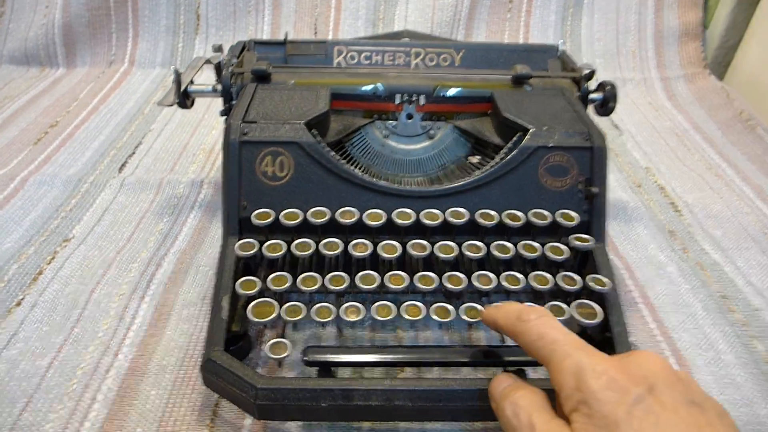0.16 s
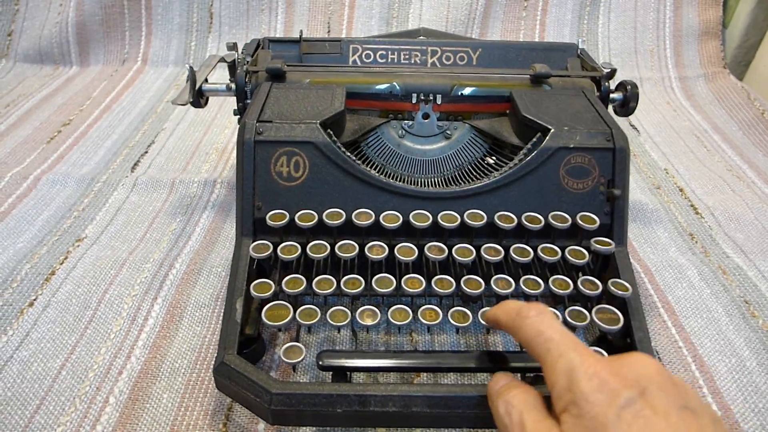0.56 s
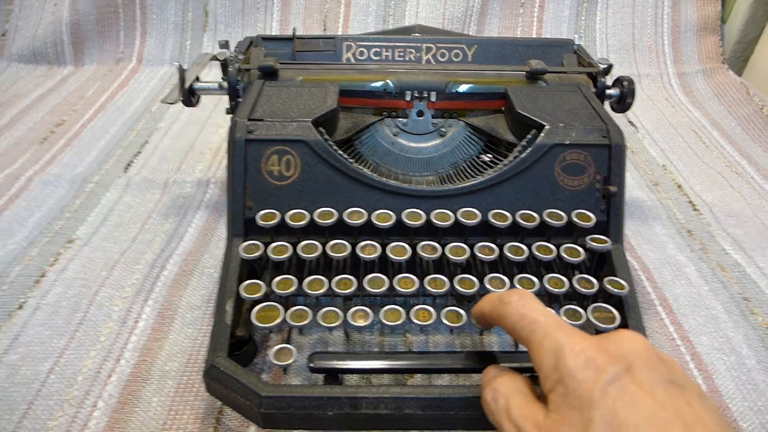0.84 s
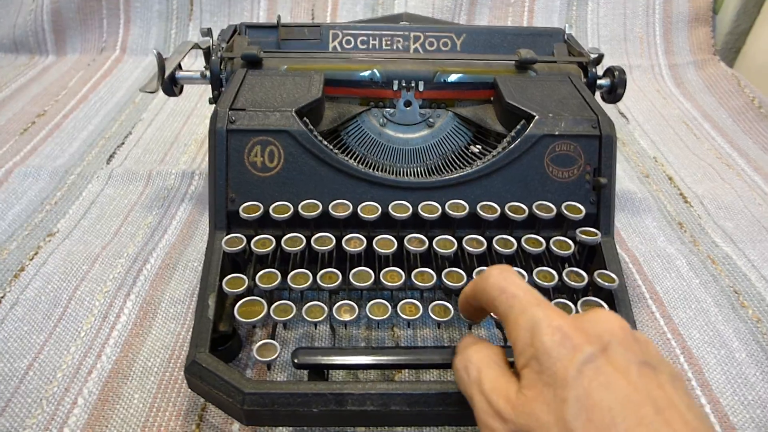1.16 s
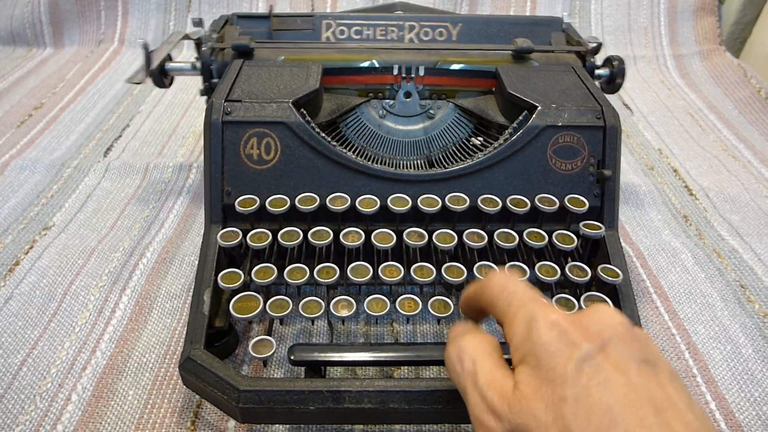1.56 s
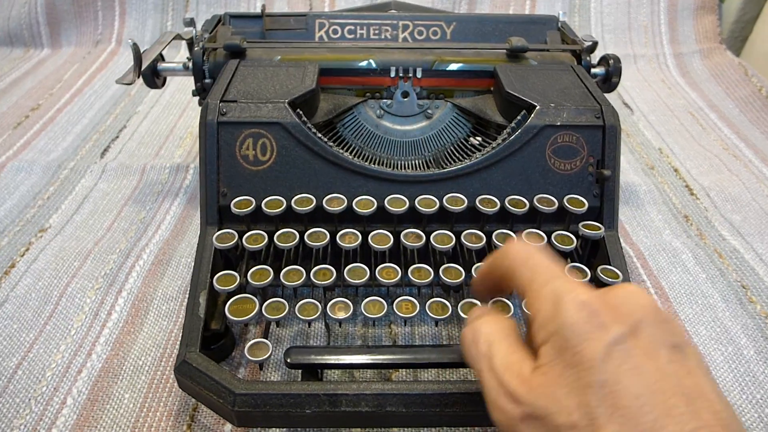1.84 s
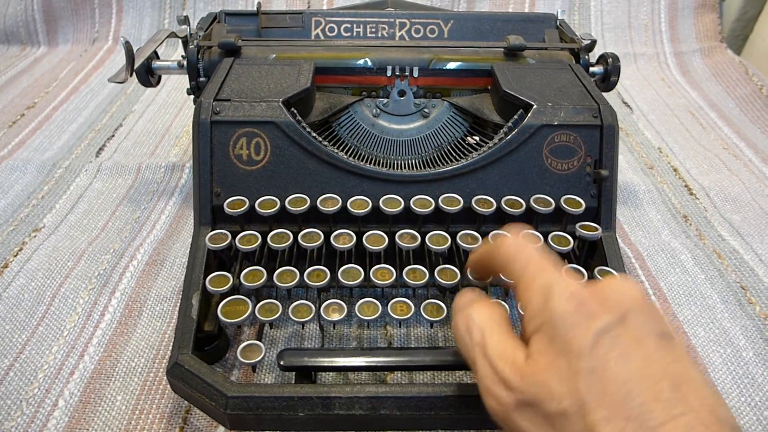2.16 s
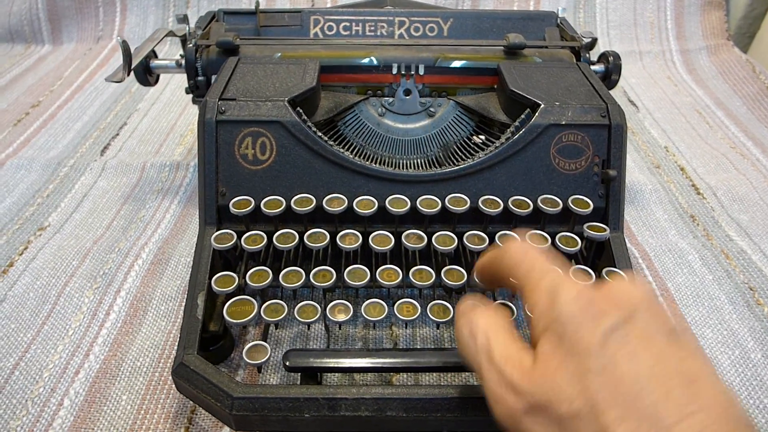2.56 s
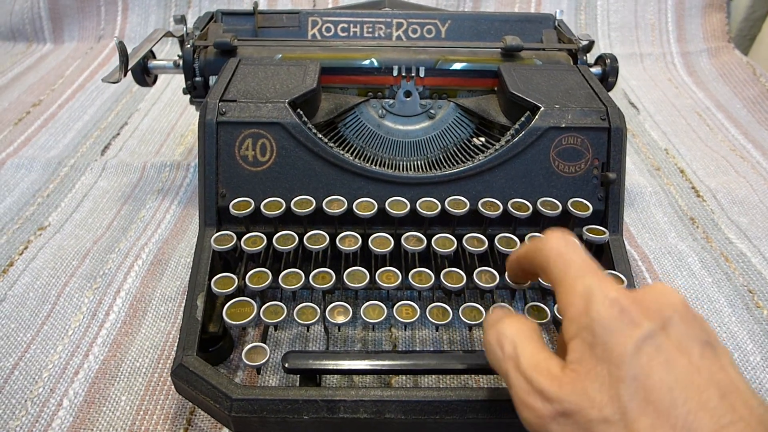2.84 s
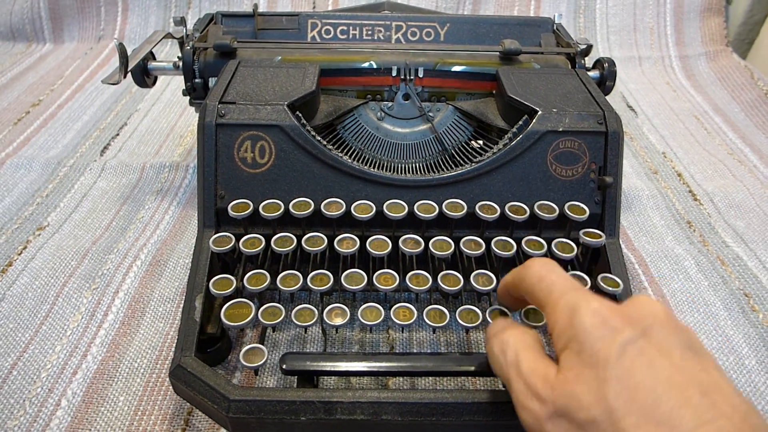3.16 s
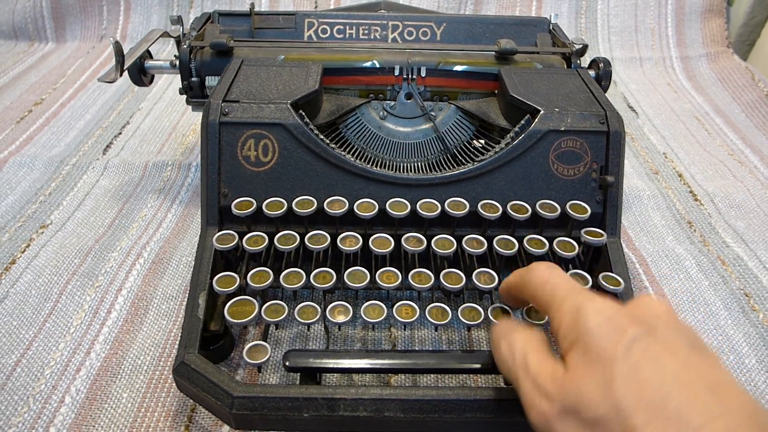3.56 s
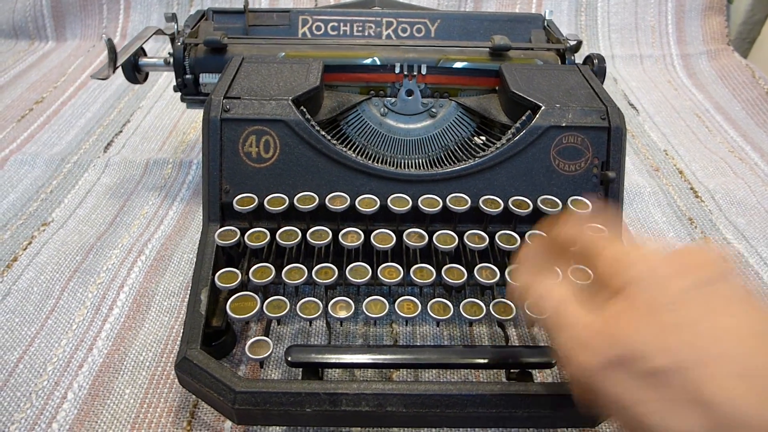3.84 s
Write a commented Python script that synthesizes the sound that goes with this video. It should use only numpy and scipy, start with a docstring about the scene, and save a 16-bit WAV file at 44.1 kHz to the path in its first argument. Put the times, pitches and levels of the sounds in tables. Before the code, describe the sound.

Typewriter keys struck by one finger, close to the microphone in a small quiet room: over a second of soft hiss, then three, three and four steady metallic clacks, with rattles and clinks between.

```python
"""Soft hiss and rumble of a small quiet room come first, with faint clinks of loose levers.
Then one finger types ten letters, in three bursts, on an old portable typewriter on a cloth, close in front.
Each stroke is a swelling clash of linkage and a thump of the case; on the hard ones the slug slaps the roller.
As the key comes up the escapement clicks and the type bar drops back and rattles; frame and springs ring on.
Clashes and rattles are shaped noise; cracks, thumps and rings are decaying sines; the room is a noise tail."""
import sys
import numpy as np
from scipy import signal
from scipy.fft import rfft, irfft
from scipy.io import wavfile
from scipy.ndimage import uniform_filter1d

SR = 44100
rng = np.random.default_rng(int(sys.argv[2]) if len(sys.argv) > 2 else 0)


def digitize_waveform(pressure):
    """Quantize a signal to 16-bit integers and store it at the path in sys.argv[1].

    Rows of a 2-D input are taken as channels; values are limited to [-1, 1].
    """
    field = np.atleast_2d(pressure).T
    bounded = np.clip(field, -1, 1)
    quanta = np.round(bounded * 32767).astype(np.int16)
    wavfile.write(sys.argv[1], SR, quanta)


N = 176400  # samples: 4 s


def undb(db):
    """Decibels to gain."""
    return 10 ** (np.asarray(db) / 20)


def unit(x):
    """Scale to rms 1."""
    return x / np.sqrt(np.mean(x ** 2))


def decay60(t, t60):
    """Exponential decay that falls 60 dB in t60 seconds."""
    return np.exp(-np.log(1000) * t / t60)


def high_pass(x, order, hz):
    """Remove the bass below a cutoff."""
    return signal.sosfilt(signal.butter(order, hz, "high", fs=SR, output="sos"), x)


def colour(x, points):
    """Filter by a spectrum of (Hz, dB) points, joined along log frequency."""
    hz, db = np.array(points, float).T
    f = np.fft.rfftfreq(len(x), 1 / SR)
    gain = undb(np.interp(np.log(f + 1), np.log(hz), db))
    return irfft(rfft(x) * gain, len(x))


def stereo(mid, side, side_db):
    """Left and right from a middle and a side signal."""
    return mid + undb(side_db) * side * np.array([[1], [-1]])


def ring(x, response):
    """Play a signal through an impulse response."""
    return signal.fftconvolve(np.atleast_2d(x), np.atleast_2d(response), axes=-1)[:, :N]


def bursts(rows):
    """Envelope of (start, dB, rise, decay) bursts, summed in power."""
    power, t = np.zeros(N + SR), np.arange(SR // 5) / SR
    for start, db, rise, decay in rows:
        i = int(start * SR)
        shape = np.minimum(t / rise, 1) * np.exp(-np.maximum(t - rise, 0) / decay)
        power[i:i + len(t)] += (undb(db) * shape) ** 2
    return np.sqrt(power[:N])


# key strokes, close in front [t/s, clash level/dB, thump level/dB, clash decay/s]
STROKES = [(1.3302, -13, -18, 0.01), (1.5237, -16.5, -22, 0.013), (1.7121, -12.5, -21, 0.0082),
           (2.2781, -15.5, -20.5, 0.011), (2.4611, -14.5, -23, 0.0091), (2.6610, -15, -20, 0.01),
           (3.2029, -13, -24, 0.011), (3.389, -17, -23.5, 0.012), (3.5906, -13, -22.5, 0.0083),
           (3.7790, -14, -24, 0.009)]
# escapement clicks as the key rises [t/s, level/dB, decay/s]
ESCAPEMENT = [(1.4209, -22, 0.01), (1.6080, -23.5, 0.012), (1.8135, -25, 0.015), (2.3594, -26.5, 0.016),
              (2.5560, -26, 0.023), (2.757, -25.5, 0.016), (3.285, -27.5, 0.024), (3.4782, -26, 0.019),
              (3.6884, -26.5, 0.017), (3.862, -28.5, 0.028)]
# type bars fall back on their rest [t/s, rattle level/dB, thud level/dB]
DROPS = [(1.446, -25, -30), (1.631, -27.5, -27), (1.84, -32, -28), (2.385, -28, -29), (2.58, -33, -25.5),
         (2.782, -28, -29), (3.314, -33, -30.5), (3.501, -30, -31.5), (3.716, -33, -28.5),
         (3.886, -37, -29)]
# loose levers clink as keys are touched and settle [t/s, level/dB, decay/s]
CLINKS = [(.345, -51.5, 0.039), (0.42, -44, .004), (0.438, -43.5, 0.0044), (1.274, -46, .004),
          (1.308, -36, 0.01), (1.410, -36, 0.0069), (1.653, -31, 0.021), (1.6819, -29, 0.01),
          (1.806, -37, 0.0063), (1.859, -33.5, 0.012), (2.045, -58, .005), (2.061, -46, 0.0043),
          (2.148, -45, 0.01), (2.167, -47, 0.016), (2.239, -33.5, 0.012), (2.255, -34, 0.034),
          (2.402, -31.5, 0.014), (2.416, -36.5, 0.027), (2.446, -31.5, .007), (2.599, -26.5, 0.0075),
          (2.631, -33.5, 0.008), (2.752, -44, .007), (2.807, -32.5, 0.023), (2.863, -41, .007),
          (2.889, -42.5, .008), (2.93, -51, .005), (2.944, -44.5, 0.0086), (2.983, -48, 0.0064),
          (3.0963, -41, 0.015), (3.1694, -33, 0.012), (3.186, -41, 0.015), (3.198, -36, .007),
          (3.243, -38, 0.011), (3.334, -32, 0.019), (3.36, -30, 0.019), (3.519, -32, 0.03),
          (3.561, -32.5, 0.0081), (3.734, -33.5, 0.026), (3.764, -42, 0.0092), (3.902, -29, 0.016)]
# spectra of clash, escapement click and loose rattle [f/Hz, relative level/dB]
CLASH = [(60, -25), (200, -23.5), (400, -17.5), (1000, -6), (1500, -9), (2400, -9), (4200, 1), (5800, -3),
         (7500, -6.5), (10000, -4), (13000, -8.5), (16000, -20)]
CLICK = [(60, -35), (200, -15), (400, -3), (1100, 3), (1600, -2.5), (2800, -1), (4500, 7), (7000, 0),
         (10000, 2), (13000, -4), (16000, -14)]
RATTLE = [(60, -30), (200, 8), (500, 2), (800, -1), (1150, 3), (1500, -1.5), (2500, 1), (4200, 3.5),
          (6000, 1.5), (8000, -2.5), (12000, -5.5), (16000, -13.5)]
CLASH_RISE_S, CLICK_RISE_S, CLINK_RISE_S = 0.0037, 0.002, 0.0024
DROP_RISE_S, DROP_DECAY_S = 0.0016, 0.013
LEAD_S, LEAD_DB = 0.01, -17.5  # the linkage scrapes before it clashes
BOUNCE_S, BOUNCE_DB = 0.01, -26  # the slug chatters after its slap
RELEASE_S, RELEASE_DB = 0.0059, -10.5  # the lever slides before the escapement lets go


def linkage():
    """Sliding and colliding metal: the clash of each stroke, the escapement, falling bars and loose levers."""
    clashes = [(s, db, CLASH_RISE_S, decay) for s, db, _, decay in STROKES]
    bounces = [(s, db + BOUNCE_DB, BOUNCE_S, BOUNCE_S) for s, db in SLAPS]
    releases = [(s, db, CLICK_RISE_S, decay) for s, db, decay in ESCAPEMENT]
    drops = [(s, db, DROP_RISE_S, DROP_DECAY_S) for s, db, _ in DROPS]
    clinks = [(s, db, CLINK_RISE_S, decay) for s, db, decay in CLINKS]
    scrapes = [(s - LEAD_S, db + LEAD_DB, LEAD_S, LEAD_S) for s, db, _, _ in STROKES]
    slides = [(s - RELEASE_S, db + RELEASE_DB, RELEASE_S / 2, RELEASE_S) for s, db, _ in ESCAPEMENT]
    clash = chatter(clashes + bounces, CLASH)
    clicks = chatter(releases, CLICK)
    rattle = chatter(drops + clinks + scrapes + slides, RATTLE)
    return clash + (clicks + rattle) * contacts()


GRAIN_DB, SIDE_DB = 0.5, -11.5  # unevenness of the contacts; side against middle


def chatter(rows, spectrum):
    """Metal parts chatter: a dense run of tiny contacts of uneven size under each burst."""
    size = 24  # samples per contact
    levels = np.repeat(undb(GRAIN_DB * rng.standard_normal(N // size + 1)), size)
    grains = unit(uniform_filter1d(levels, size)[:N])
    mid, side = (unit(colour(rng.standard_normal(N) * grains, spectrum)) for _ in range(2))
    return stereo(mid, side, SIDE_DB) * bursts(rows)


CONTACTS_PER_S, CONTACT_S, CONTACT_DB = 1500, .0012, 3.5  # mean rate, amplitude decay, spread of size


def contacts():
    """Level of loose parts knocking together: random tiny hits, each dying fast, even on average."""
    chance, size = rng.random(N), undb(CONTACT_DB * rng.standard_normal(N))
    hits = (chance < CONTACTS_PER_S / SR) * size ** 2
    power = signal.lfilter([1], [1, -np.exp(-2 / (CONTACT_S * SR))], hits)
    power = power + .1 * power.mean()  # never quite silent between hits
    return np.sqrt(power / uniform_filter1d(power, size=500))


# the slug slaps the roller [t/s, level/dB]
SLAPS = [(1.3433, -9), (1.7240, -7.5), (3.2139, -3), (3.5999, -4.5), (3.7884, -6)]
# modes of slug and roller, pitch varied a little per slap [f/Hz, relative level/dB, rise and decay/s]
ROLLER = [(2920, -6, 0.00077), (3196, -5.5, 0.00069), (5510, 1.5, 0.00038), (6970, -9.5, 0.00044)]


def slugs():
    """The slug hits the rubber roller: a loud crack of a few cycles, from heavily damped modes."""
    out, t = np.zeros(N + SR), np.arange(SR // 50) / SR
    chances = rng.standard_normal((len(SLAPS), len(ROLLER)))
    for (s, db), chance in zip(SLAPS, chances):
        i = int(s * SR)
        for (hz, mode_db, decay), c in zip(ROLLER, chance):
            swell = t / decay * np.exp(1 - t / decay)  # peaks at 1
            tone = np.sin(2 * np.pi * hz * (1 + 0.016 * c) * t)
            out[i:i + len(t)] += undb(db + mode_db) * swell * tone
    return out[:N]


# a finger lands on a key and nudges the case [t/s, level/dB]
TOUCHES = [(2.165, -53), (3.105, -43.5), (3.181, -36)]
# spectrum of a falling bar's thud [f/Hz, relative level/dB]
THUD = [(40, -16), (170, -4), (250, -3.5), (400, -15.5), (520, 0), (1200, -1.5), (2500, -25)]
# spectrum of the whole machine jolting on the cloth [f/Hz, relative level/dB]
JOLT = [(40, -18), (85, 0), (117, 2.5), (140, -1.5), (170, 2), (240, -1.5), (330, -12), (500, 3),
        (640, -1.5), (800, -12), (1100, -2), (1500, -31), (3000, -19), (8000, -68)]
THUMP_LAG_S, PUSH_S, PUSH_CUT_HZ = 0.00298, 0.0012, 132
THUD_RISE_S, THUD_DECAY_S = 0.0083, .016
JOLT_DB, SHUDDER_DB, SHUDDER_S = -5.5, -13.5, 0.014  # after a bar or finger; after a stroke, and its length


def case():
    """Each stroke pushes the case once and leaves it shuddering; falling bars and fingers shake it softly."""
    t, out = np.arange(SR // 2) / SR, np.zeros(N + SR)
    chances = rng.standard_normal((len(STROKES), len(CASE), 2))
    for (s, _, db, _), chance in zip(STROKES, chances):
        i = int((s + THUMP_LAG_S) * SR)
        out[i:i + len(t)] += undb(db) * case_ring(chance) * (1 - np.exp(-t / PUSH_S))
    pushes = high_pass(out[:N], 2, PUSH_CUT_HZ)
    falls = bursts([(s, db, THUD_RISE_S, THUD_DECAY_S) for s, *_, db in DROPS + TOUCHES])
    body = case_ring(np.zeros((len(CASE), 2)))
    thuds = colour(rng.standard_normal(N), THUD) * falls
    shake = ring(thuds, body / np.sqrt(np.sum(body ** 2)))[0]
    shudder = bursts([(s + THUMP_LAG_S, db + SHUDDER_DB, SHUDDER_S, SHUDDER_S) for s, _, db, _ in STROKES])
    jolts = unit(colour(rng.standard_normal(N), JOLT)) * (undb(JOLT_DB) * falls + shudder)
    return pushes + shake + jolts


# modes of the case, before variation by key [f/Hz, relative level/dB, t60/s]
CASE = [(218, -17, 0.12), (252.7, -10, 0.15), (299, -2.5, 0.05), (345.5, -6, 0.078), (404, -5, 0.088),
        (508.2, -9, 0.12), (645, -12, 0.081), (1062, -13, 0.1), (1170, -21.5, 0.066)]


def case_ring(chance):
    """Response of the case to one push; the shares and pitches of its modes vary with each stroke."""
    t, out = np.arange(SR // 2) / SR, 0
    for (hz, db, t60), (a, b) in zip(CASE, chance):
        out = out + undb(db + a) * np.sin(2 * np.pi * hz * (1 + 0.021 * b) * t) * decay60(t, t60)
    return out


# single springs ping briefly [t/s, f/Hz, level/dB]
PINGS = [(.421, 4300, -42), (.440, 3120, -43), (1.316, 5730, -36), (1.649, 7200, -25.5), (1.683, 5420, -29),
         (1.683, 3710, -31), (1.860, 7230, -32), (2.762, 4490, -27), (3.533, 4000, -27.5),
         (3.562, 3140, -33)]
PING_DECAY_S = 0.0084
LEVER_LOW_HZ, LEVER_HIGH_HZ, LEVER_DB, LEVER_DECAY_S = 2516, 12460, -14, 0.011


def springs():
    """Small springs plucked by moving levers; every knocked lever also rings at four pitches of its own."""
    t, out = np.arange(SR // 8) / SR, np.zeros((2, N + SR))
    knocks = [(s, db) for s, db, _ in CLINKS + ESCAPEMENT + DROPS]
    tones = [(s, hz, db, PING_DECAY_S, 0) for s, hz, db in PINGS]
    for (s, db), chance in zip(knocks, rng.random((len(knocks), 4, 2))):
        for a, b in chance:
            hz = LEVER_LOW_HZ * (LEVER_HIGH_HZ / LEVER_LOW_HZ) ** a
            tones.append((s, hz, db + LEVER_DB, LEVER_DECAY_S, b - .5))
    for s, hz, db, decay, pan in tones:
        i = int(s * SR)
        envelope = np.minimum(t / CLINK_RISE_S, 1) * np.exp(-t / decay)
        tone = undb(db) * np.sin(2 * np.pi * hz * t) * envelope
        out[:, i:i + len(t)] += np.array([[1 + pan], [1 - pan]]) * tone
    return out[:, :N]


# ringing of frame, bars and springs [f/Hz, relative level/dB, t60/s]
STEEL = [(2201, 18, 0.9), (3194, 3, 0.14), (3170, -5, .25), (3700, -50.5, .25), (4170, 15.5, 0.17),
         (4544, -10.5, 0.54), (4932, 6, 0.52), (5260, -11.5, .25), (6410, -27, 0.14), (7075, 7, 0.12),
         (8420, 47, 0.083), (9650, -22.5, .2), (11200, -33, .2)]
STEEL_DB, TAIL_SIDE_DB = -26, -7.5  # level of the ringing; side against middle, here and in the room


def steel():
    """Response of frame and springs: thin, high rings, with phases of their own in middle and side."""
    t = np.arange(SR // 2) / SR
    mid, side = np.zeros((2, len(t)))
    for part in (mid, side):
        for hz, db, t60 in STEEL:
            phase = rng.uniform(0, 2 * np.pi)
            part += undb(db) * np.sin(2 * np.pi * hz * t + phase) * decay60(t, t60)
    return stereo(mid, side, TAIL_SIDE_DB) * undb(STEEL_DB) / np.sqrt(np.sum(mid ** 2))


# spectrum of the room's tail [f/Hz, level/dB]
TAIL = [(80, -7), (160, -2), (500, -7.5), (1100, -5.5), (2000, -6), (4500, -9.5), (8000, -9.5),
        (15000, -23)]
T60_LOW_S, T60_HIGH_S, TAIL_RISE_S = 0.44, 0.34, 0.0013


def room():
    """Response of the small room: a dense tail; treble dies first, bass is alike in both channels."""
    t = np.arange(SR * 3 // 4) / SR
    low_pass, tails = signal.butter(2, 2500, fs=SR, output="sos"), []
    for _ in range(2):
        noise = rng.standard_normal(len(t))
        low = signal.sosfiltfilt(low_pass, noise)
        tail = low * decay60(t, T60_LOW_S) + (noise - low) * decay60(t, T60_HIGH_S)
        tail *= 1 - np.exp(-t / TAIL_RISE_S)
        # padding keeps the filter from wrapping round
        coloured = colour(np.pad(tail, SR // 10), TAIL)[SR // 10:-SR // 10]
        tails.append(coloured / np.sqrt(np.sum(tail ** 2)))
    return stereo(tails[0], high_pass(tails[1], 1, 450), TAIL_SIDE_DB)


# spectrum of the room's air [f/Hz, relative level/dB]
AIR = [(20, -15.5), (45, -26), (80, -17), (115, -3.5), (160, -9.5), (230, 3), (350, -4), (450, -8),
       (650, -5.5), (780, -12.5), (1000, -5.5), (1500, -14.5), (2200, -17.5), (3100, -24), (4800, -17),
       (7000, -27.5), (10000, -30), (15000, -37)]
# gain of the room tone over time [t/s, level/dB]
AIR_DB = [(0, -45.5), (.8, -47), (1.25, -47.5), (2.1, -50.5), (3.05, -51.5), (4, -52)]
# low resonances in the room tone [f/Hz, width/Hz, relative level/dB]
DRONE = [(165, 15, -12.5), (223.5, 10.6, -8.5), (372.7, 27, -7.5)]
AIR_SIDE_DB = -15.5


def room_tone():
    """Soft hiss and rumble with a few wavering low resonances (narrow noise bands), slowly fading."""
    f = np.fft.rfftfreq(N, 1 / SR)
    mid, side = (unit(colour(rng.standard_normal(N), AIR)) for _ in range(2))
    drone = np.zeros(N)
    for hz, width, db in DRONE:
        resonance = 1 / (1 + (2 * (f - hz) / width) ** 2)
        drone += undb(db) * unit(irfft(rfft(rng.standard_normal(N)) * resonance, N))
    side = colour(side, [(30, 27), (100, -24), (300, 1.5), (1000, 9.5), (8000, 8.5)])
    fade = undb(np.interp(np.arange(N) / SR, *np.array(AIR_DB).T))
    return stereo(undb(-2.5) * mid + drone, side, AIR_SIDE_DB) * fade


LOW_CUT_HZ, SLAP_ROOM_DB, CASE_ROOM_DB = 76, -13.5, -1.5  # thump cutoff; sends into the room
BALANCE_DB = .5  # left over right


def scene():
    """The machine close in front of the microphones, its ringing, the room."""
    levers, slaps = linkage(), slugs()
    thumps = high_pass(case(), 3, LOW_CUT_HZ)
    levers_mono = levers.mean(axis=0)
    into_room = levers_mono + undb(SLAP_ROOM_DB) * slaps + undb(CASE_ROOM_DB) * thumps
    machine = levers + springs() + slaps + thumps + ring(levers_mono, steel())
    balance = undb(np.array([[BALANCE_DB], [-BALANCE_DB]]) / 2)
    return (machine + ring(into_room, room()) + room_tone()) * balance


TOP_HZ = 15600


def record(dry):
    """Peaks are clipped at full scale, then a steep low-pass cuts the top."""
    low_pass = signal.ellip(10, .2, 90, TOP_HZ, fs=SR, output="sos")
    return signal.sosfilt(low_pass, np.clip(dry, -1, 1))


dry = scene()
out = record(dry)
digitize_waveform(out)
```